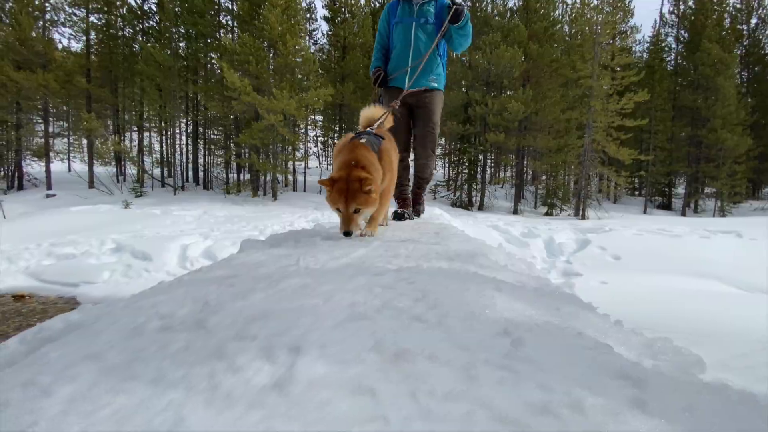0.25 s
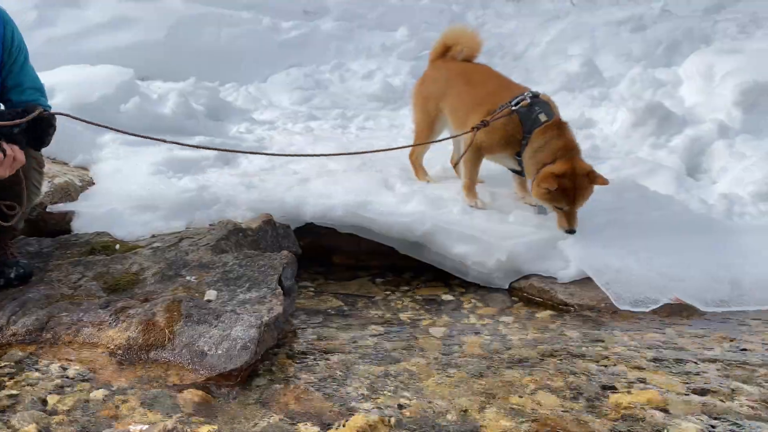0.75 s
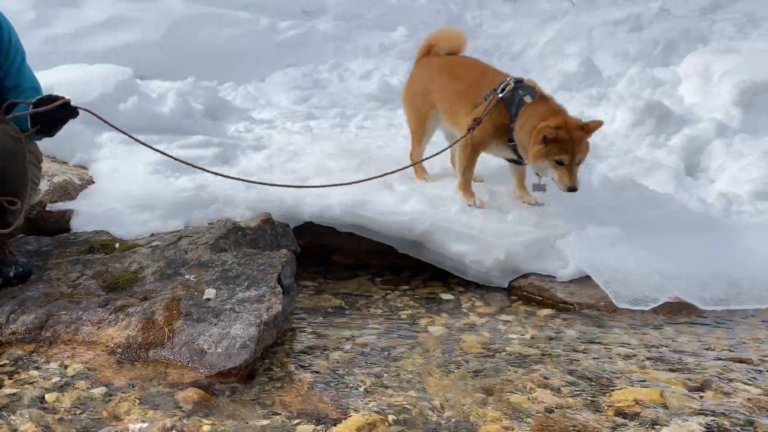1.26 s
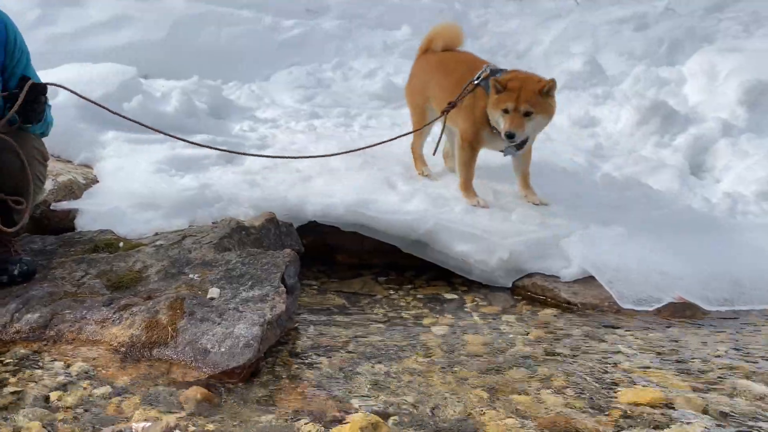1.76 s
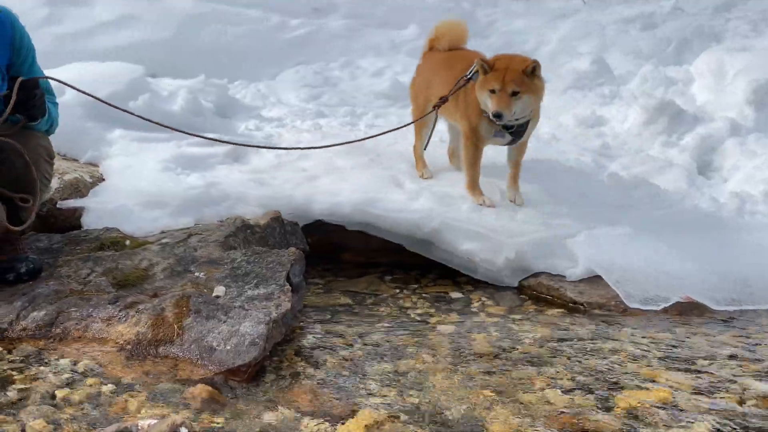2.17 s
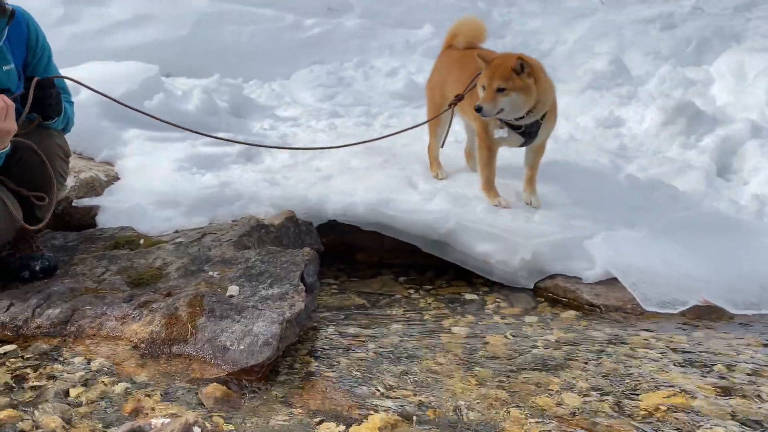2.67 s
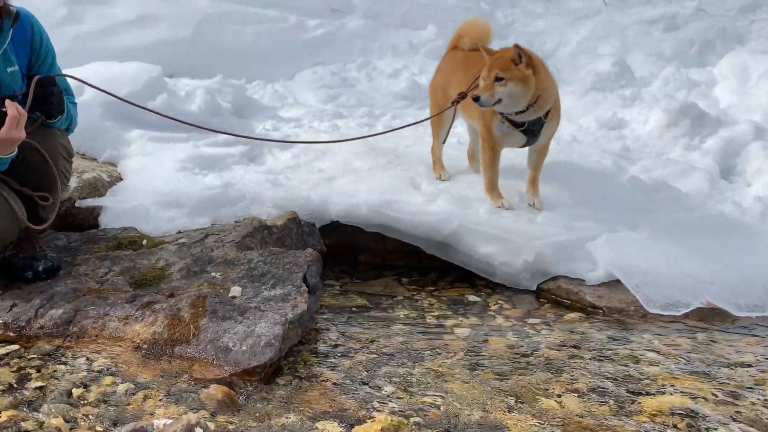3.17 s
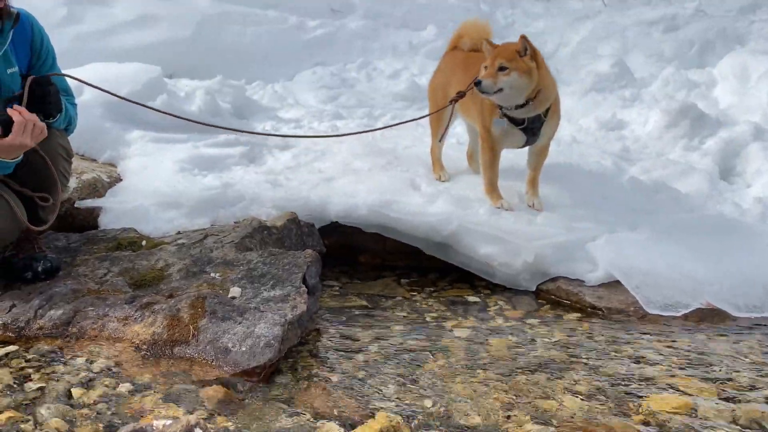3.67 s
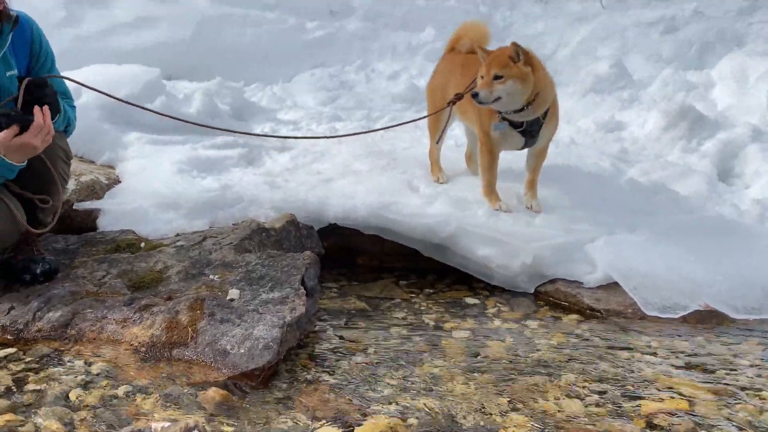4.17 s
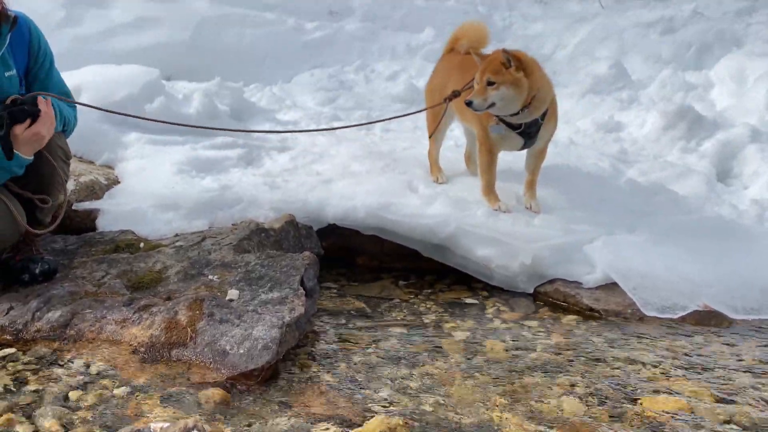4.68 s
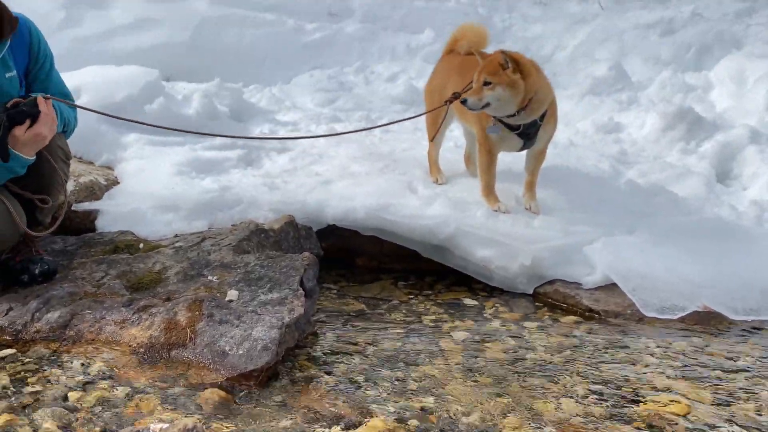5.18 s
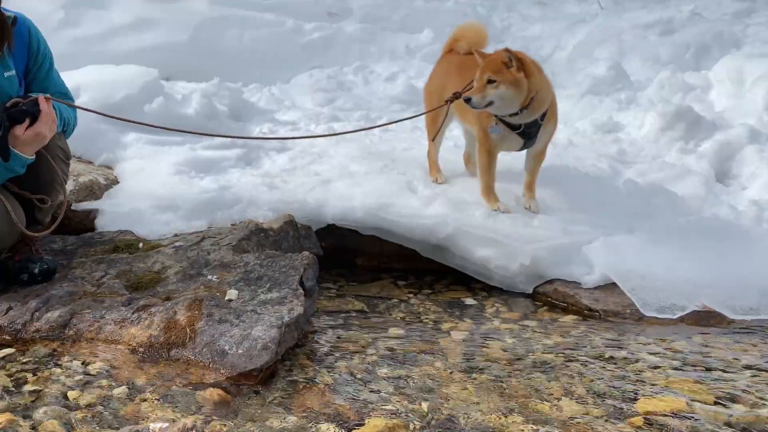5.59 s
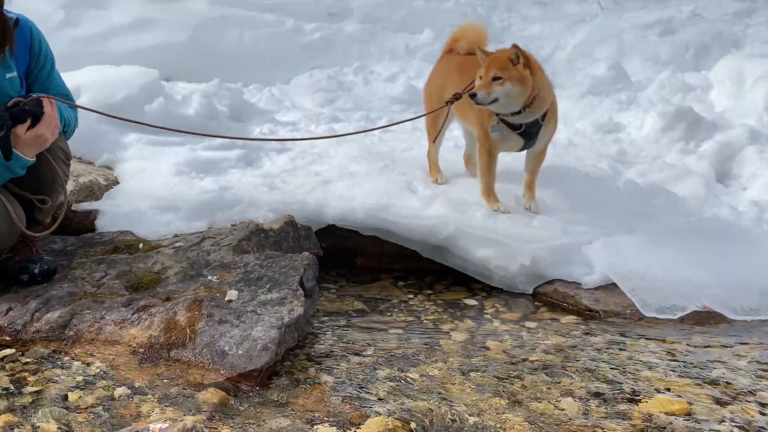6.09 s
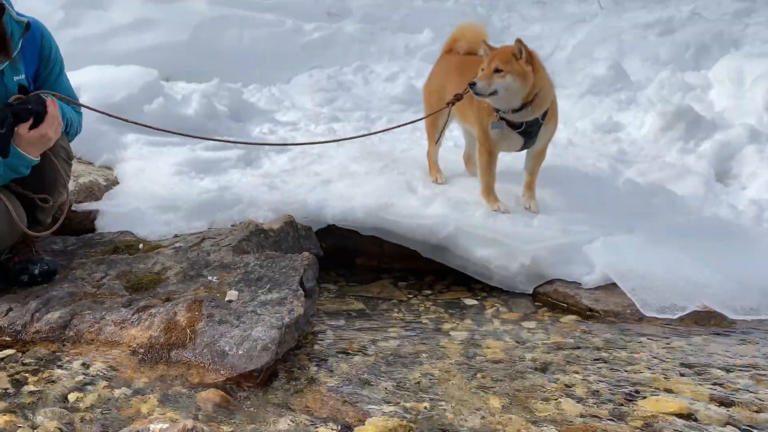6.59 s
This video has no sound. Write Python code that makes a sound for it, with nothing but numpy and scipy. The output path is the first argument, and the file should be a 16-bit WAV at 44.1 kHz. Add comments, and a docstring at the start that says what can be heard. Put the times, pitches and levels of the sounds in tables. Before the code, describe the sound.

A dog and walker crunch briefly on crusty snow, the creek only a far, even hiss. After less than half a second the microphone is suddenly beside shallow water trickling over pebbles, with pitched plops, fine spray and short livelier gurgles. Bassy wind buffets the microphone throughout, easing now and then, and growing hardest and raspiest around six seconds.

```python
"""Two steps crunch in crusty snow while a shallow creek, heard from afar, is a smooth rush of modulated noise.
Abruptly the view is from the bank: decaying sine bubbles plop and swarm, and spray ticks over a low wash.
Wavelets lift the gurgle now and then. Throughout, wind on the microphone rumbles, roars and flutters as
shaped noise that follows its strength; later the hardest eddies thump as slowing swings and rasp."""
import sys
import numpy as np
from scipy import signal
from scipy.fft import rfft, irfft
from scipy.io import wavfile
from scipy.ndimage import uniform_filter1d

SR = 44100
rng = np.random.default_rng(int(sys.argv[2]) if len(sys.argv) > 2 else 0)


def wav_out(sig):
    """Save sig, one row per channel (or a flat mono array), as 16-bit PCM at SR to the path in sys.argv[1]."""
    wavfile.write(sys.argv[1], SR, np.round(np.clip(np.atleast_2d(sig).T, -1, 1) * 32767).astype(np.int16))


N = 301644
TIME = np.arange(N) / SR
BANK_S = 0.427  # the view from the bank begins

# Large near bubbles. Each row: start in seconds, level in dB, pitch in Hz, cycles of ringing to 1/e.
PLOPS = [(0.562, -38.5, 1100, 9.3), (0.72, -43.5, 1780, 8), (0.801, -44, 1560, 9.3), (0.859, -43, 584, 9),
         (0.898, -40, 1120, 6.6), (0.948, -42, 1366, 8), (0.975, -38, 1604, 8.3), (0.993, -41.5, 1460, 9.8),
         (1.158, -46, 730, 6), (1.158, -39, 1546, 8.5), (1.387, -45, 1190, 7.3), (2.008, -42.5, 1450, 7.3),
         (2.331, -53, 710, 8.6), (2.368, -47.5, 964, 11), (2.537, -43, 1480, 9), (2.607, -32, 1476, 6.6),
         (2.779, -37, 1595, 5.6), (2.778, -48.5, 570, 10), (3.93, -41, 2010, 9.5), (4.261, -50, 1250, 7),
         (4.357, -42, 1730, 8), (4.674, -40.5, 1185, 5.8), (4.831, -36, 1450, 7), (5.122, -43.5, 1360, 8),
         (5.227, -47, 1160, 10), (5.368, -41, 1660, 9.2), (5.532, -45, 2250, 12), (5.557, -41, 1850, 8.4),
         (5.764, -47, 870, 10), (5.946, -41, 1520, 9), (5.987, -41, 1390, 10), (6.378, -48, 1204, 10)]
# Sharp near droplets. Each row: start in seconds, level in dB, pitch in Hz.
DROPLETS = [(0.6414, -45, 5100), (0.6871, -38, 5220), (0.947, -36.5, 4300), (0.9937, -37, 4970),
            (1.3358, -39.5, 4800), (1.464, -37.5, 4760), (1.5518, -39, 6450), (1.656, -40, 6340),
            (1.867, -47, 4600), (1.9584, -41, 7900), (2.366, -42, 3870), (2.6367, -48, 4100),
            (2.8612, -39, 4530), (3.04, -39, 7060), (4.058, -39, 5700), (4.1328, -35.5, 5500),
            (4.3396, -45, 3630), (4.3896, -39, 6100), (5.024, -45, 10800), (5.2644, -44.5, 4200),
            (5.391, -35, 7100), (5.6447, -42, 6500), (5.742, -47, 4350), (6.5187, -44, 5300)]
# Larger wavelets washing over the stones. Each row: crest in seconds, lift of the gurgle in dB.
SURGES = [(0.98, 8.5), (2.23, 9), (2.36, 6.5), (2.58, 7), (2.85, 9), (5.57, 1.5), (6.15, 5)]
SURGE_S = 0.062  # from the crest until the lift in dB has fallen to 1/e
SURGE_SPRAY = 0.41  # share of the lift that the spray follows
GURGLE_DB, SPRAY_DB, WASH_DB = -61, -68, -64.5  # gurgle and spray stand so between surges
# Spectrum of the near water. Each row: frequency in Hz, relative level in dB per Hz.
WATER_SPECTRUM = [(150, -11), (300, -3), (550, -2), (800, 1), (1500, 5), (2000, 1.5), (2500, -9),
                  (3200, -16), (5000, -13), (7500, -16), (9200, -23.5), (11000, -17.5), (13000, -21),
                  (15500, -34.5)]
# Spectrum of the distant creek. Each row: frequency in Hz, relative level in dB per Hz.
FAR_RUSH_SPECTRUM = [(150, 6), (400, 2), (900, -2.5), (1600, -5.5), (3000, -9.5), (6000, -12), (9000, -14),
                     (12000, -16.5), (15500, -27)]
FAR_DB = -52.5

# Gusts on the microphone. Each row: start in seconds, length in seconds, strength in dB,
# extra flutter of small eddies in dB.
GUSTS = [(0.023, 0.1, -34, 9), (0.213, 0.027, -26.5, -10), (0.29, 0.039, -29, -11.5),
         (0.404, 0.014, -28.5, -29), (0.887, 0.12, -41, -2), (1.155, 0.0083, -31.5, 4.5),
         (1.709, 0.099, -30.5, 7), (2.057, 0.015, -39.5, 7), (2.155, 0.035, -28, 2.5),
         (2.224, 0.033, -20, -8.5), (2.484, 0.015, -33, 9.5), (2.583, 0.022, -37.5, 5),
         (2.656, 0.061, -34, 3.5), (2.961, 0.025, -40.5, 22), (3.049, 0.025, -31, 3),
         (3.594, 0.047, -37, 7.5), (3.788, 0.025, -35, 6), (3.947, 0.065, -28, -2.5),
         (4.111, 0.059, -27, -1), (4.207, 0.04, -29, 1), (4.363, 0.12, -27.5, -0.5),
         (4.542, 0.05, -27.5, 1.5), (4.757, 0.11, -25.5, -1.5), (5.421, 0.037, -47.5, -6),
         (5.707, 0.083, -28.5, 0.5), (5.802, 0.029, -32, -4), (5.922, 0.057, -25, -6),
         (6.041, 0.14, -28, 9), (6.234, 0.15, -26, 2.5), (6.542, 0.03, -33.5, 1), (6.626, 0.04, -28, -0.5)]
GUST_RISE_S, GUST_FALL_S = 0.0092, 0.013  # exponential time constants
# Breeze at the bank between gusts. Each row: time in seconds, strength in dB.
BANK_BREEZE = [(0.45, -69), (0.71, -74), (0.82, -58.5), (1.45, -52.5), (1.62, -39.5), (1.95, -43.5),
               (2.35, -39), (3.05, -40), (3.15, -56), (3.34, -59), (3.7, -39), (4.9, -40), (5.1, -57),
               (5.66, -53.5), (5.78, -34.5), (6.7, -35.5), (6.84, -55)]
FAR_BREEZE_DB = -39.5  # out on the open snow
BREEZE_SWAY_DB, BREEZE_SWAY_HZ = 4, 13.5  # the breeze never holds still
STIFF_DB = -29  # the strength of a stiff gust
RUMBLE_DB, ROAR_DB, FLUTTER_DB = -31.5, -32.5, -45  # each layer in such a gust
RUMBLE_GROWTH, ROAR_GROWTH, FLUTTER_GROWTH = 0.74, 1.26, 1.67  # dB gained for each dB of wind
# Spectrum of the large eddies. Each row: frequency in Hz, relative level in dB per Hz.
RUMBLE_SPECTRUM = [(10, -15.5), (25, -13), (40, -0.5), (60, 6.5), (80, 0.5), (110, -9), (170, -27),
                   (260, -48), (500, -81.5)]
# Spectrum of the roar. Each row: frequency in Hz, relative level in dB per Hz.
ROAR_SPECTRUM = [(40, -33), (70, -1.5), (95, -2), (125, -8), (170, -23.5), (260, -49), (500, -88)]
# Spectrum of the small eddies. Each row: frequency in Hz, relative level in dB per Hz.
FLUTTER_SPECTRUM = [(80, -52), (130, 6), (180, 6.5), (250, -6.5), (350, -18), (500, -30.5), (800, -32),
                    (1500, -42.5), (4000, -84)]
# The hardest eddies, landing as single thumps. Each row: start in seconds, level in dB.
BUFFETS = [(1.716, -32), (1.786, -49), (2.159, -32), (2.215, -29), (3.79, -37.5), (3.963, -32.5),
           (4.15, -44), (4.367, -28), (4.393, -24.5), (4.455, -37), (4.548, -30), (4.774, -34.5),
           (4.831, -30.5), (4.869, -30), (5.696, -27.5), (5.705, -26), (5.754, -25), (5.949, -34.5),
           (6.077, -28), (6.106, -25.5), (6.152, -23.5), (6.159, -21.5), (6.172, -29.5), (6.187, -28.5),
           (6.224, -27), (6.249, -24), (6.311, -26.5), (6.566, -30), (6.637, -32.5)]
# Spectrum of air tearing at the port. Each row: frequency in Hz, relative level in dB per Hz.
RASP_SPECTRUM = [(150, -24.5), (330, 11), (600, 4), (850, -12.5), (1300, -28), (3000, -50)]
RASP_DB, RASP_GROWTH, RASP_S = -50.5, 1.97, 0.013  # in a stiff buffet; dB per dB of buffet; decay

# Steps in crusty snow. Each row: start in seconds, level in dB, decay in seconds.
STEPS = [(0.006, -45.5, 0.0065), (0.106, -48, 0.051)]
# Spectrum of the breaking crust. Each row: frequency in Hz, relative level in dB per Hz.
CRUNCH_SPECTRUM = [(200, -20), (700, 12), (1800, 5.5), (3000, -2), (9000, -39)]

LOW_CUT_HZ, EDGE_HZ = 32.3, 15800  # the microphone's bass roll-off; the upper band limit


def creek():
    """Superposition: resonant bubbles gurgle and fine spray ticks over the wash of riffles further off."""
    surge_db = sum(db * np.exp(-((TIME - s) / SURGE_S) ** 2) for s, db in SURGES)
    deep = swarm(low_hz=418.4, high_hz=3437, cycles=8.9, rise=0.0674,
                 spread_db=6.0, snap_db=-14, clump_s=.03, count=5400)
    gurgle = coloured(deep, WATER_SPECTRUM)
    fizz = swarm(low_hz=2517, high_hz=13800, cycles=7.0, rise=0.046,
                 spread_db=5.0, snap_db=-31.5, clump_s=.01, count=8100)
    spray = coloured(evened(fizz) + gain_of(-3.0) * evened(film_snaps()), WATER_SPECTRUM)
    wash = coloured(rng.standard_normal(N) * gain_of(2 * drift(43)), WATER_SPECTRUM)
    # wavelets slopping over the stones throw up bubbles and spray together
    slop = evened(gain_of(2.1 * drift(21.3)))
    bubbling = gain_of(GURGLE_DB + surge_db) * gurgle
    bubbling += gain_of(SPRAY_DB + SURGE_SPRAY * surge_db) * spray
    return slop * bubbling + gain_of(WASH_DB) * wash


def swarm(low_hz, high_hz, cycles, rise, spread_db, snap_db, clump_s, count):
    """Clustered emission: collapsing ripples shed bubbles of all sizes in threes, most of them faint."""
    draws = rng.random((count, 5))
    ripple_s = np.repeat(rng.random(count) * N / SR, 3)[:count]
    out = np.zeros(N)
    for s, (lag, pitch, size, damping, glide) in zip(ripple_s, draws):
        hz = low_hz + (high_hz - low_hz) * pitch
        ring_cycles = cycles * (.5 + damping)
        strength = gain_of(-spread_db * np.log(size + .015)) * np.sqrt(hz / ring_cycles)
        add(out, s + lag * clump_s, strength * plop(hz, ring_cycles, 2 * rise * glide, snap_db))
    return out


def film_snaps(rate_hz=130):
    """Impulsive radiation: bursting films snap at random moments, without a pitch."""
    strength = gain_of(-5.5 * np.log(rng.random(N) + 0.02))
    snaps = (rng.random(N) < rate_hz / SR) * strength
    return signal.sosfilt(signal.butter(2, 3000, "high", fs=SR, output="sos"), snaps)


def near_water():
    """Free oscillation: plops and droplets beside the bank each ring at a pitch of their own."""
    out = np.zeros(N)
    for s, db, hz, cycles in PLOPS:
        add(out, s, gain_of(db) * plop(hz, cycles, rise=0.0444, snap_db=-18.0))
    for s, db, hz in DROPLETS:
        add(out, s, gain_of(db) * plop(hz, cycles=4.1, rise=0.012, snap_db=-13))
    return out


def plop(hz, cycles, rise, snap_db, size=60):
    """Impulse excitation: a bubble pinches off with a tiny broad snap and rings."""
    ring = bubble(hz, cycles, rise)
    snap = rng.standard_normal(size) * np.exp(-4 * np.arange(size) / size)
    add(ring, 0, gain_of(snap_db) * snap)
    return ring


def bubble(hz, cycles, rise):
    """Damped resonance: trapped air rings, and its pitch rises as it nears the surface."""
    turns = np.arange(int(5 * cycles * SR / hz) + 2) * hz / SR
    age = turns / cycles  # in decay times; the pitch gains the fraction rise in each
    envelope = np.exp(-age) * (1 - np.exp(-2 * turns))
    return np.sin(2 * np.pi * turns * (1 + rise * age / 2)) * envelope


def rocks(x, echo_db, decay_s, size=2200):
    """Diffuse reflection: stones and the ice shelf scatter a short, faint echo."""
    t = np.arange(size) / SR
    taps = rng.standard_normal(size) * np.exp(-t / decay_s) * (t > .002)
    return x + gain_of(echo_db) * signal.oaconvolve(x, taps / np.linalg.norm(taps))[:N]


def far_creek():
    """Incoherent summation: with distance the bubbles merge into a rush with only a fine grain."""
    grains = rng.standard_normal(N) * gain_of(3.2 * drift(1060) + drift(60))
    return gain_of(FAR_DB) * coloured(grains, FAR_RUSH_SPECTRUM)


def wind(breeze_db, gusts):
    """Turbulent pressure: large eddies rumble, a roar grows faster with wind, small eddies flutter fastest."""
    power = gain_of(breeze_db + BREEZE_SWAY_DB * drift(BREEZE_SWAY_HZ)) ** 2
    eddies = np.zeros(N)
    for start, length, db, eddy_db in gusts:
        blow = gust(start, length, db) ** 2
        power = power + blow
        eddies += eddy_db * blow
    force_db = 10 * np.log10(power) - STIFF_DB
    # each gust's extra flutter counts by its share of the wind's power
    flutter_db = FLUTTER_DB + FLUTTER_GROWTH * force_db + eddies / power
    rumble = gain_of(RUMBLE_DB + RUMBLE_GROWTH * force_db) * turbulence(RUMBLE_SPECTRUM, size=1400)
    roar = gain_of(ROAR_DB + ROAR_GROWTH * force_db) * turbulence(ROAR_SPECTRUM, size=1100)
    flutter = gain_of(flutter_db + 5.3 * drift(34)) * turbulence(FLUTTER_SPECTRUM, size=800)
    return rumble + roar + flutter


def gust(start, length, db):
    """Exponential growth and decay: a gust rises quickly, holds and falls away."""
    early = np.maximum(start - TIME, 0)
    late = np.maximum(TIME - start - length, 0)
    return gain_of(db) * np.exp(-early / GUST_RISE_S - late / GUST_FALL_S)


def buffets(size=3500):
    """Nonlinear growth: the hardest eddies thump singly, and the harder they land, the more they rasp."""
    thumps, tearing = np.zeros(N), np.zeros(N)
    rasp_decay = np.exp(-np.arange(size) / SR / RASP_S)
    for s, db in BUFFETS:
        add(thumps, s, gain_of(db) * buffet(start_hz=537, end_hz=90.5, slowing_s=0.004586, swell_s=0.011))
        add(tearing, s, gain_of(RASP_DB + RASP_GROWTH * (db - STIFF_DB)) * rasp_decay)
    return thumps + uniform_filter1d(tearing, size=90) * turbulence(RASP_SPECTRUM, size=400)


def buffet(start_hz, end_hz, slowing_s, swell_s, size=3500):
    """Transient pressure: an eddy strikes the port, a quick flick that slows into a far larger swing."""
    t = np.arange(size) / SR
    hz = end_hz + (start_hz - end_hz) * np.exp(-t / slowing_s)
    hz = hz * rng.uniform(0.814, 1.222)  # no two eddies are alike
    swell = t / swell_s * np.exp(1 - t / swell_s)
    return np.sin(2 * np.pi * np.cumsum(hz) / SR) * swell


def footsteps():
    """Brittle fracture: the snow crust gives way in a dying shower of small cracks."""
    cracks = rng.standard_normal(N) * (rng.random(N) < 2500 / SR)  # 2500 a second
    crunch = coloured(cracks, CRUNCH_SPECTRUM)
    return crunch * sum((TIME > s) * gain_of(db) * np.exp(-abs(TIME - s) / decay) for s, db, decay in STEPS)


def turbulence(points, size):
    """Constant mean power: coloured noise is evened over spans of some size in samples."""
    x = coloured(rng.standard_normal(N), points)
    power = uniform_filter1d(uniform_filter1d(x ** 2, size), size)
    return x / np.sqrt(abs(power) + 1e-9)


def coloured(x, points):
    """Linear filtering: convolution shapes the spectrum of x, then its rms is set to one."""
    return evened(signal.oaconvolve(x, causal_taps(points))[:N])


def causal_taps(points, size=8192):
    """Minimum phase: the impulse response of a spectrum with the sharpest possible attack."""
    hz, db = np.transpose(points)
    bins_hz = abs(np.fft.fftfreq(size, 1 / SR))
    log_gain = np.log(gain_of(np.interp(np.log(bins_hz + 1), np.log(hz), db)))
    # the phase is the Hilbert transform of the log gain
    return np.fft.ifft(np.exp(np.conj(signal.hilbert(log_gain)))).real[:size // 2]


def drift(rate_hz):
    """Low-passed chance: slow Gaussian fluctuation with an rms of one."""
    hz = np.fft.rfftfreq(N, 1 / SR)
    return evened(irfft(rfft(rng.standard_normal(N)) * np.exp(-(hz / rate_hz) ** 2), N))


def evened(x):
    """Normalisation: scales to an rms of one."""
    return x / np.sqrt(np.mean(x ** 2) + 1e-20)


def gain_of(db):
    """Logarithmic level: decibels to amplitude."""
    return 10 ** (np.asarray(db) / 20)


def add(mix, s, sound):
    """Linear superposition: mixes a sound in at time s."""
    part = mix[max(round(s * SR), 0):][:len(sound)]
    part += sound[:len(part)]


def scene():
    """Superposition: the far view gives way abruptly to the bank; the wind blows through both."""
    at_bank = np.clip((TIME - BANK_S) / .002, 0, 1)
    far_gusts = [row for row in GUSTS if row[0] < BANK_S]
    far = far_creek() + footsteps() + wind(FAR_BREEZE_DB, far_gusts)
    water = rocks(creek() + near_water(), echo_db=-14.5, decay_s=0.0088)
    breeze_db = np.interp(TIME, *np.transpose(BANK_BREEZE))
    bank_gusts = [row for row in GUSTS if row[0] > BANK_S]
    bank = water + wind(breeze_db, bank_gusts) + buffets()
    return ((1 - at_bank) * far + at_bank * bank)[None]


def record(dry):
    """Band limitation: the microphone rolls off the bass and the recorder cuts the extreme treble."""
    heard = signal.sosfilt(signal.butter(2, LOW_CUT_HZ, "high", fs=SR, output="sos"), dry)
    band_limit = signal.firwin(511, EDGE_HZ, window=("kaiser", 9), fs=SR)
    return signal.oaconvolve(heard, band_limit[None], "same")


dry = scene()
out = record(dry)
wav_out(out)
```